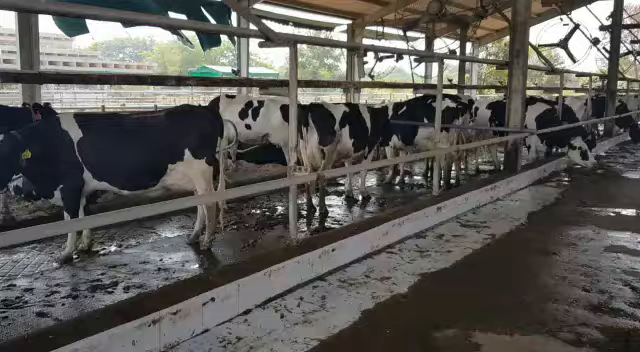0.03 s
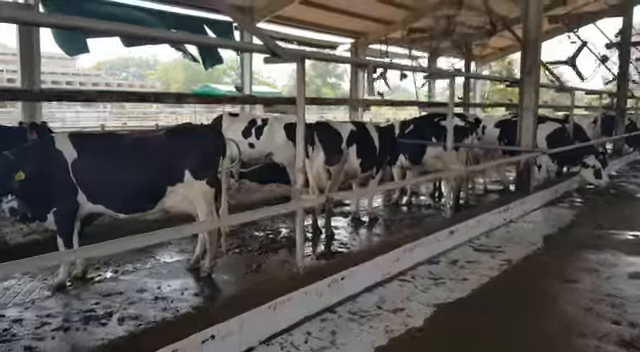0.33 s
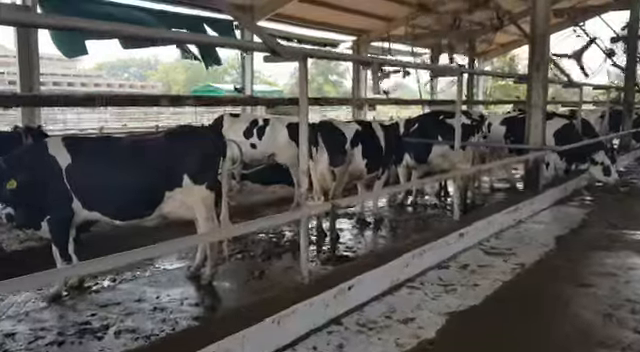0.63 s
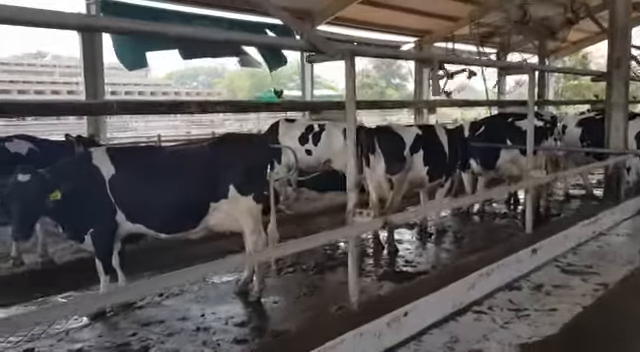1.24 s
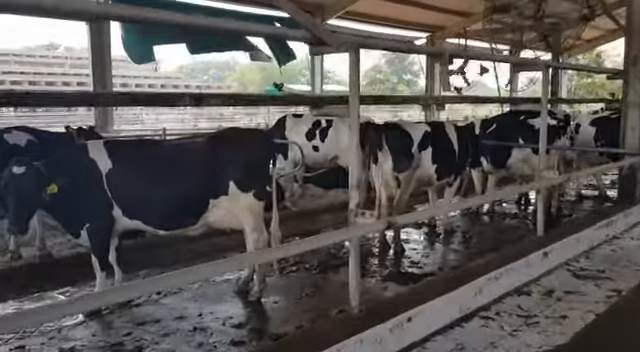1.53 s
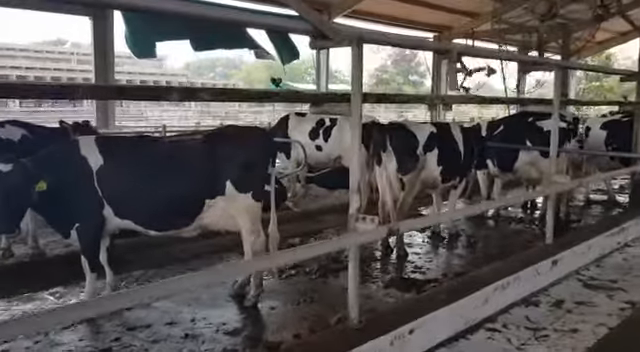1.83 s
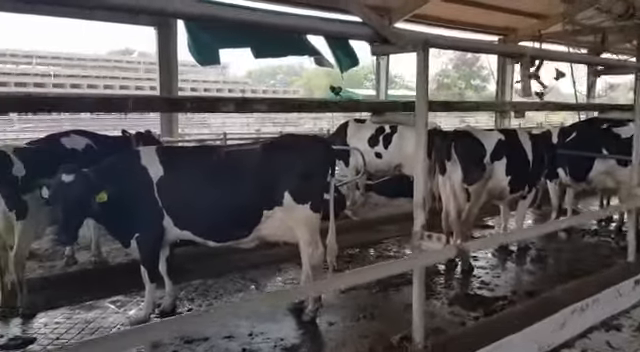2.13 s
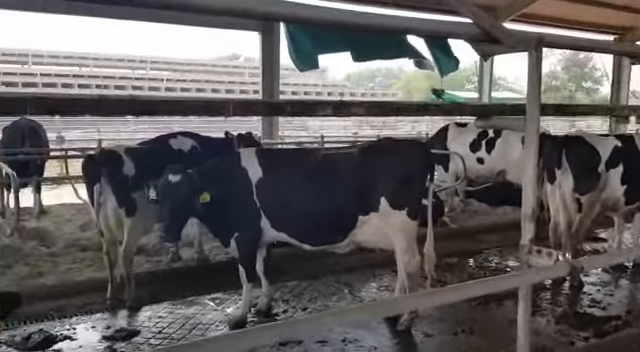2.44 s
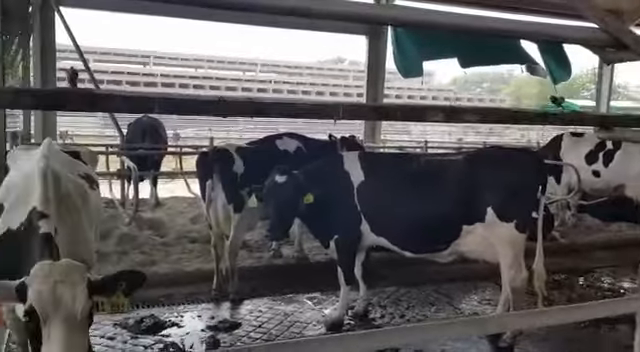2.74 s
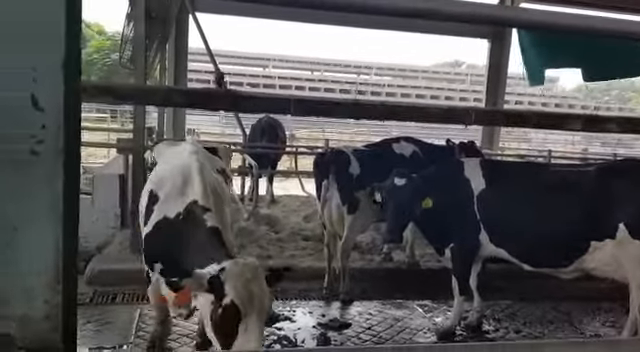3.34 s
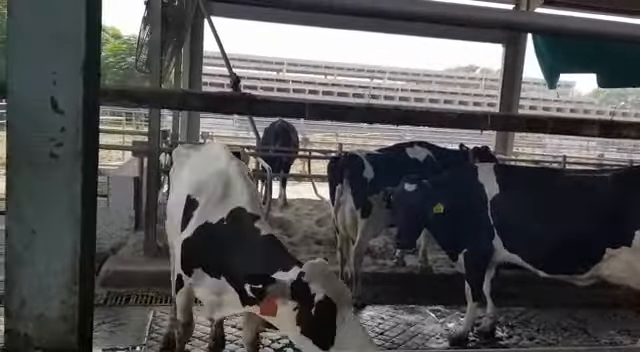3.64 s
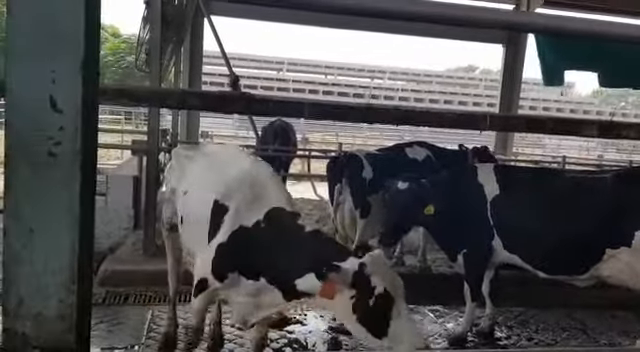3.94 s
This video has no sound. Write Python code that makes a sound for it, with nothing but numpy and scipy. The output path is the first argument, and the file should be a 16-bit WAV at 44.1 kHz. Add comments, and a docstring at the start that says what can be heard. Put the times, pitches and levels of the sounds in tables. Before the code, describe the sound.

A flock of small birds, likely sparrows, chatters under a barn roof while a pump hums and fans rush. A close bird and a thin squeak stand out at first, and a soft swish passes midway.

```python
"""An open-sided cow barn. After a moment of silence a pump hums, fans rush, and a flock of small birds, likely
sparrows, chirps under the roof; all three carry on to the end. Early on, one close bird chatters in short
paired notes and a belt or bearing squeaks thinly, twice a turn. As the squeak recedes, a hollow fan drone
swells and sinks. A brief swish, perhaps of water, passes in the middle; the close bird thins out to single
notes, and near the end the drone swells again."""
import sys
import numpy as np
from scipy import signal
from scipy.fft import rfft, irfft, next_fast_len
from scipy.io import wavfile
from scipy.ndimage import uniform_filter1d, map_coordinates

SR = 44100
rng = np.random.default_rng(int(sys.argv[2]) if len(sys.argv) > 2 else 0)


def store_pcm(level_fs):
    """Save levels as 16-bit WAV."""
    pcm = np.round(np.clip(level_fs, -1, 1) * 32767).astype(np.int16)
    wavfile.write(sys.argv[1], SR, np.atleast_2d(pcm).T)


N = 176400
T = np.arange(N) / SR

# Stereo width of hum and noise. Each row: frequency in Hz, left-right correlation (1 is mono).
EAR_LIKENESS = [(60, 1), (200, 0.91), (400, .8), (750, 0.52), (1100, -0.12), (1500, -0.21), (2050, .12),
                (2800, -0.072)]
NOTE_S, NOTE_VOICE = 0.0241, dict(bend=.15, rough=.035, rasp=.4)  # the short, harsh bird note


def pump_hum():
    """Pump and fan motors hum in steady partials, each wavering in strength and phase."""
    # Each row: frequency in Hz, level in dB before the fader, depth of the waver as a share.
    partials = [(74.9, -19.5, 0.051), (97.2, -46, 0.74), (112.5, -37.5, 0.19), (150.2, -26.5, 0.14),
                (167.3, -36, 0.1), (226.6, -38, 0.49), (329, -43.5, 0.59), (374.6, -47, 0.34),
                (596, -48.5, 0.6), (712.4, -40.5, 1.3), (756, -45.5, 0.79), (774, -47.5, 1.6),
                (830.4, -48.5, .6), (1058, -50, 1.4)]
    # Each row: time in seconds, gain on the whole hum in dB.
    fader = [(.1, -3), (.85, -1.5), (1.6, -1.3), (2.35, 1.2), (3.1, -0.5), (4, 0.9)]
    out = np.zeros((2, N))
    for hz, db, unsteady in partials:
        rate = 5 + hz / 55  # higher partials waver faster
        waver = unit(1 + unsteady * (wobble(rate) + 1j * wobble(rate)))
        phase = 2 * np.pi * (hz * T + rng.random())
        ear_shift = ear_angle(hz) * np.array([[1], [-1]])
        out += amp(db) * np.sqrt(2) * np.real(waver * np.exp(1j * (phase + ear_shift)))
    return out * amp(curves(fader)[0]) * pan(left_db=0.5)


def fan_rush():
    """Fans move air: a broad, even bed of noise."""
    # Each row: frequency in Hz, relative noise density in dB.
    spectrum = [(25, -19), (40, -11), (55, -7.5), (85, -10), (125, 1), (200, -0.5), (400, -3), (580, -4.5),
                (740, -2.5), (950, -7.5), (1220, -6), (1550, -8.5), (1950, -7), (2500, -10), (3500, -5),
                (4500, -11.5), (5300, -23.5), (6300, -20), (7400, -21.5), (8600, -33.5), (10300, -27.5),
                (12200, -27), (13600, -30), (15800, -31)]
    # Each row: time in seconds, level in dB that the rush drifts around.
    fader = [(.1, -22.5), (.75, -21), (1.2, -21.5), (2, -23), (2.6, -22), (3.1, -23.5), (4, -22)]
    return amp(curves(fader)[0] + 1.05 * wobble(4.45)) * rush(spectrum, patchy_db=0.78)


def near_bird():
    """One close bird chatters in short, harsh notes, rich in overtones."""
    # Each row: start in seconds, pitch at the top of the arch in Hz, level in dB.
    notes = [(.096, 3700, -19.5), (.140, 3720, -18), (.262, 3850, -23.5), (.297, 4250, -23.5),
             (.332, 3900, -22), (.342, 3850, -19.5), (.380, 4000, -35), (.500, 3750, -25),
             (.507, 3200, -19), (.538, 4050, -24.5), (.549, 3500, -27), (.588, 3550, -31),
             (.668, 3480, -30), (.706, 3950, -27), (.746, 3750, -24), (.785, 4080, -25.5),
             (.868, 4000, -29), (.948, 3020, -27), (.987, 3700, -25), (1.028, 3780, -31),
             (1.070, 3900, -34), (1.112, 3700, -28), (1.155, 3950, -34), (1.190, 3720, -25.5),
             (1.228, 4080, -26), (1.390, 3200, -28), (1.428, 3700, -28), (1.55, 3800, -35),
             (1.63, 3700, -30), (1.874, 3810, -32), (2.21, 3600, -37), (2.525, 3820, -29.5),
             (2.968, 3800, -29), (3.34, 3620, -31.5)]
    # Gain of each harmonic in dB, fundamental first.
    harmonics = [-1, -7.5, -9, -11]
    out = np.zeros(N)
    for s, hz, db in notes:
        add(out, s, amp(db) * chirp(NOTE_S, hz, hz, harmonics, **NOTE_VOICE))
    return barn(out, early_db=18.5, tail_db=9.5, early_s=0.0044) * pan(left_db=2.5)


def clear_chirps():
    """Single birds stand out of the flock with purer, gliding whistles."""
    # Each row: start and length in seconds, start and end of the glide in Hz, level in dB.
    calls = [(0.283, 0.04, 4900, 4200, -30), (0.36, 0.04, 4900, 4250, -30.5),
             (0.512, 0.032, 4700, 4370, -29), (0.551, 0.066, 3200, 3090, -22.5),
             (0.751, 0.13, 4850, 4830, -38), (0.947, 0.057, 3008, 2930, -23),
             (1.21, 0.024, 5000, 4700, -37), (2.148, 0.039, 4700, 4340, -30.5),
             (2.272, 0.043, 3250, 2990, -20), (2.326, .04, 3300, 3110, -27),
             (2.416, 0.0556, 3100, 3200, -22), (2.517, .07, 4720, 3800, -29),
             (2.726, 0.048, 3500, 3180, -25), (2.959, 0.054, 3900, 3620, -26),
             (2.983, 0.035, 4900, 4000, -29), (3.17, 0.043, 3400, 3100, -23),
             (3.33, 0.037, 3500, 3620, -25.5), (3.388, 0.067, 3960, 4840, -32),
             (3.559, 0.044, 3100, 2800, -24), (3.61, 0.038, 3500, 3820, -23.5),
             (3.854, .045, 3700, 4730, -27.5), (3.927, 0.063, 3100, 2960, -26)]
    # Gain of each harmonic in dB, fundamental first.
    harmonics = [2.5, -16, -27, -26]
    out = np.zeros(N)
    for s, length, start_hz, end_hz, db in calls:
        note = chirp(length, start_hz, end_hz, harmonics, bend=.09, rough=.055, rasp=.3)
        add(out, s, amp(db) * note)
    return barn(out, early_db=12.5, tail_db=7.5, early_s=.014) * pan(left_db=6.5)


def flock(perch_count=4, chirps_per_s=240, low_hz=3001, high_hz=4432):
    """Far birds blur into unbroken chatter; each perch has its own path through the barn."""
    # Gain of each harmonic in dB, fundamental first.
    harmonics = [2, -19, -30, -35]
    perches = np.zeros((perch_count, N))
    draws = rng.random((int(chirps_per_s * N / SR), 5))
    for k, (when, long, pitch, glide, loud) in enumerate(draws):
        start = (k + 3 * (when - .5)) / chirps_per_s
        length = .05 * (.5 + long)
        hz = low_hz * (high_hz / low_hz) ** pitch
        slide = hz * 0.0498 * (2 * glide - 1)
        note = chirp(length, hz - slide, hz + slide, harmonics, bend=.11, rough=.035, rasp=.35)
        add(perches[k % perch_count], start, amp(2 * (2 * loud - 1)) * note)
    chatter = sum(barn(perch, early_db=11, tail_db=16.5, early_s=0.019) for perch in perches)
    return amp(-24) * unit(chatter) * pan(left_db=5.0)


def swish():
    """A soft swell of upper-midrange hiss, perhaps water."""
    # Each row: frequency in Hz, relative noise density in dB.
    spectrum = [(900, -32), (1500, -5), (1850, 1.5), (2150, -0.5), (2600, -11), (3600, -30)]
    # Each row: time in seconds, level in dB.
    fader = [(1.55, -51), (1.78, -26.5), (2.08, -27.5), (2.25, -36.5), (2.7, -36), (2.9, -59)]
    return amp(curves(fader)[0]) * rush(spectrum, patchy_db=-0.5)


def shaft_squeak(turns_per_s=24):
    """A belt or bearing whistles thinly; its pitch swings once a turn, its strength peaks twice."""
    # Each row: time in seconds, level in dB, centre pitch in Hz, warble depth in Hz.
    automation = [(.1, -34, 9100, 190), (.25, -37, 8970, 130), (.4, -41.5, 9050, 100),
                  (.75, -44.5, 9150, 90), (1.05, -50.5, 9030, 80), (1.55, -50, 9180, 120),
                  (1.95, -43.5, 9140, 230), (2.5, -48, 9050, 230), (3.0, -51, 9050, 80.5),
                  (3.25, -49, 9100, 70), (4, -48, 9070, 70)]
    level_db, centre_hz, depth_hz = curves(automation)
    turn = 2 * np.pi * np.cumsum(turns_per_s + 1.22 * wobble(7.2)) / SR
    ragged_hz = 95 * wobble(900) + 60 * wobble(50)
    hz = centre_hz + depth_hz * np.sin(turn) + ragged_hz
    tone = np.sin(2 * np.pi * np.cumsum(hz) / SR)
    strength = amp(-1.5 * np.cos(2 * turn) + 1.8 * wobble(90))
    squeak = amp(level_db) * unit(tone * strength)
    return barn(squeak, early_db=-11, tail_db=-1, early_s=.003) * pan(left_db=-0.5)


def stray_notes(notes_per_s=22, centre_hz=3636):
    """Birds on other perches drop in the same harsh notes, faintly and at random."""
    # Gain of each harmonic in dB, fundamental first.
    harmonics = [1, -9.5, -12.5, -16]
    out = np.zeros(N)
    for when, pitch, loud in rng.random((int(notes_per_s * N / SR), 3)):
        hz = centre_hz * (1 + .3 * (pitch - .5))
        gain = amp(-34.5 + 2.7 * (loud + 0.5))
        add(out, when * N / SR, gain * chirp(NOTE_S, hz, hz, harmonics, **NOTE_VOICE))
    return barn(out, early_db=11, tail_db=9, early_s=.009) * pan(left_db=-1.0)


def fan_drone():
    """A hollow band of fan noise swells and sinks twice."""
    # Each row: frequency in Hz, relative noise density in dB.
    spectrum = [(500, -25), (660, -2), (715, 3), (775, 3.5), (900, -11), (1050, -16), (1200, 0),
                (1600, -25)]
    # Each row: time in seconds, level in dB.
    fader = [(.1, -49), (.45, -51), (.7, -32), (1.0, -45), (1.3, -58), (2.8, -48), (3.3, -34), (4, -41)]
    return amp(curves(fader)[0]) * rush(spectrum, patchy_db=1.5)


def chirp(length, start_hz, end_hz, harmonics_db, bend, rough, rasp):
    """A gliding bird note: bend droops both ends, rough flutters the pitch, rasp the strength."""
    progress = np.linspace(0, 1, int(max(length, .005) * SR))
    glide_hz = start_hz + (end_hz - start_hz) * progress
    arch = 1 - bend * (2 * progress - 1) ** 2
    hz = glide_hz * (arch + rough * wobble(900, len(progress)))
    phase = 2 * np.pi * np.cumsum(hz) / SR
    flutter = unit(np.exp(rasp * wobble(500, len(progress))))
    envelope = np.sin(np.pi * progress ** 0.72)
    tone = sum(amp(db) * np.sin(k * phase) for k, db in enumerate(harmonics_db, 1))
    return np.sqrt(2) * flutter * envelope * tone


def rush(spectrum, patchy_db):
    """Diffuse stereo noise of rms 1, mottled with patches of random gain."""
    # Each row: frequency in Hz, left over right in dB.
    balance = [(100, 2), (500, 1), (1200, 2.5), (2400, 5.5), (4500, 0.5), (8000, -2), (15000, 2)]
    cells = signal.stft(rng.standard_normal((2, N)), nperseg=512)[2]
    patches = uniform_filter1d(rng.standard_normal(cells.shape[1:]), size=6, axis=0)
    patches = uniform_filter1d(patches, size=16, axis=1)
    noise = signal.istft(cells * amp(patchy_db * unit(patches)), nperseg=512)[1][:, :N]
    width = lambda hz: [np.cos(ear_angle(hz)), np.sin(ear_angle(hz))]
    mid, side = filtered(noise, lambda hz: amp(along(spectrum, hz)) * width(hz))
    ears = np.array([mid + side, mid - side])
    return unit(filtered(ears, lambda hz: pan(along(balance, hz))))


def barn(x, early_db, tail_db, early_s):
    """Direct sound, a quick scatter off roof and posts, and the barn's tail; power is kept."""
    # Each row: frequency in Hz, seconds for the tail to fall 60 dB.
    decay_times = [(500, 1), (3500, 0.29), (8000, 0.25), (15000, 0.26)]
    hz, t, cells = signal.stft(rng.standard_normal((2, SR // 2)), SR, nperseg=256)
    decay = amp(-60 * t / along(decay_times, hz)[:, None])
    tail = signal.istft(cells * decay, SR, nperseg=256)[1]
    early = rng.standard_normal(tail.shape) * np.exp(-np.arange(tail.shape[1]) / SR / early_s)
    impulse = amp(tail_db) * tail / np.linalg.norm(tail[0])
    impulse += amp(early_db) * early / np.linalg.norm(early[0])
    impulse[:, 0] += 1  # direct sound
    ears = signal.fftconvolve(x[None], impulse, axes=1)[:, :N]
    return ears * x.std() / ears.std(axis=1, keepdims=True)


def ear_angle(hz):
    """Mid-side angle in radians; 0 is mono."""
    return np.arccos(np.clip(along(EAR_LIKENESS, hz), -1, 1)) / 2


def amp(db):
    """Decibels to gain."""
    return 10 ** (np.asarray(db) / 20)


def unit(x):
    """Scale to rms 1."""
    return x / np.sqrt(np.mean(np.abs(x) ** 2) + 1e-20)


def along(points, hz):
    """Read (Hz, value) points on a log frequency axis."""
    knots_hz, values = np.transpose(points)
    return np.interp(np.log(hz + 1), np.log(knots_hz + 1), values)


def curves(rows):
    """One automation curve for each column after the time."""
    times, *columns = np.transpose(rows)
    return [np.interp(T, times, column) for column in columns]


def wobble(rate, size=N):
    """A smooth random curve, rate knots a second."""
    knots = rng.standard_normal(int(size * rate / SR) + 4)
    return map_coordinates(knots, [np.arange(size) * rate / SR])


def filtered(x, response):
    """Equalise x with a gain given as a function of Hz."""
    size = next_fast_len(N + SR // 2)
    return irfft(rfft(x, size) * response(np.fft.rfftfreq(size, 1 / SR)), size)[..., :N]


def pan(left_db):
    """Left and right gains, left_db apart."""
    return amp(np.array([[.5], [-.5]]) * left_db)


def add(track, s, sound):
    """Mix a sound in at s seconds."""
    i = int(np.clip(s * SR, 0, N))
    track[i:i + len(sound)] += sound[:N - i]


def scene():
    """Machines and swish, with the birds on top."""
    bed = pump_hum() + fan_rush() + fan_drone() + swish() + shaft_squeak()
    return bed + near_bird() + stray_notes() + clear_chirps() + flock()


def record(dry, start_s=.105, top_hz=15900):
    """The sound cuts in after a moment of silence, with the very top of the treble cut off."""
    return filtered(dry * (T >= start_s), lambda hz: hz < top_hz)


dry = scene()
out = record(dry)
store_pcm(out)
```